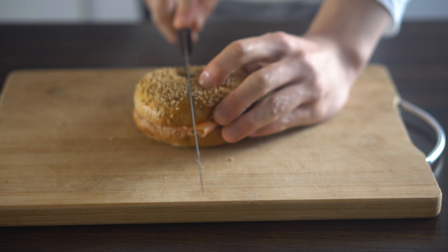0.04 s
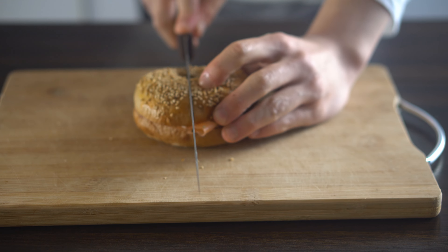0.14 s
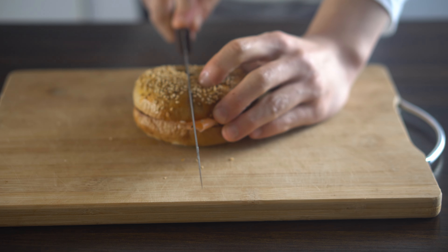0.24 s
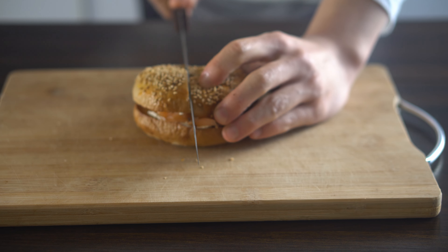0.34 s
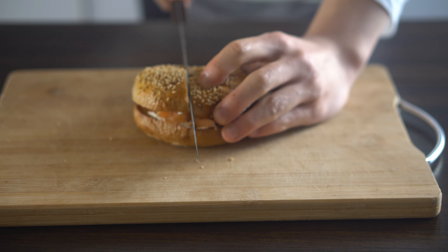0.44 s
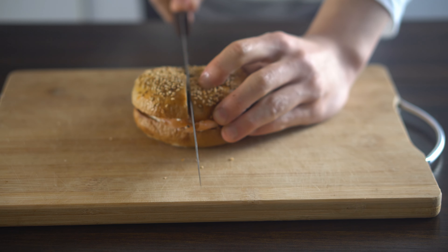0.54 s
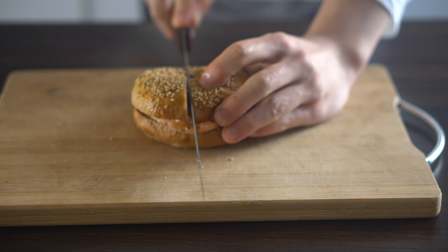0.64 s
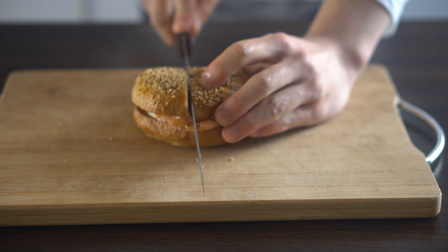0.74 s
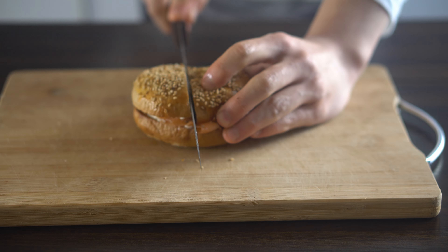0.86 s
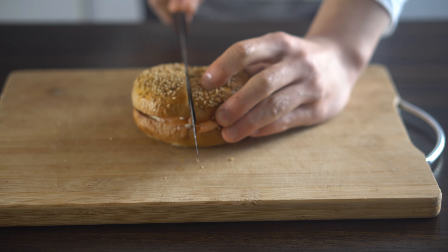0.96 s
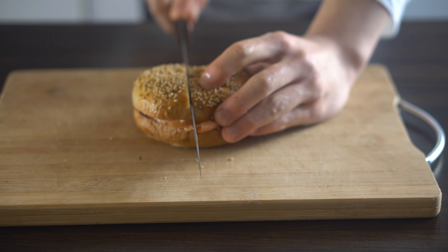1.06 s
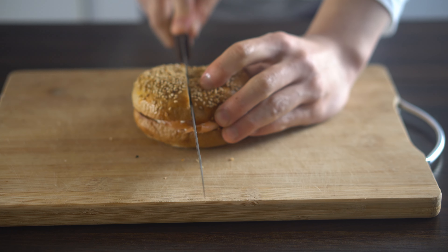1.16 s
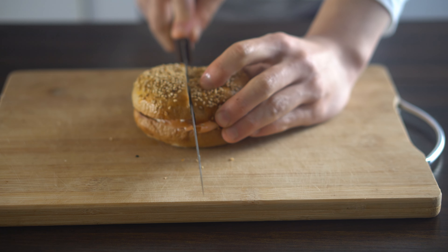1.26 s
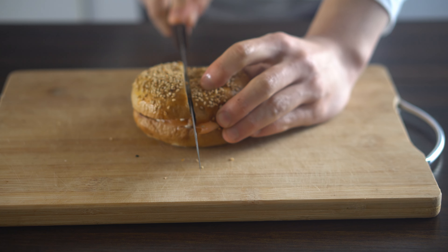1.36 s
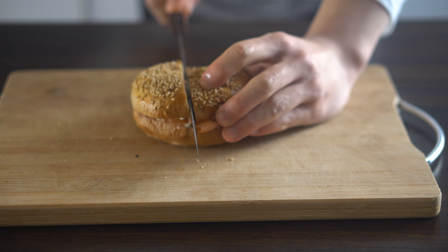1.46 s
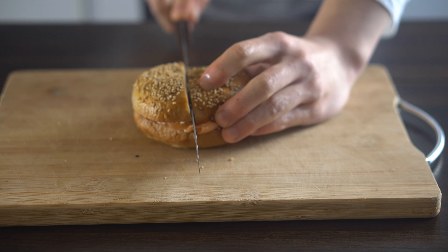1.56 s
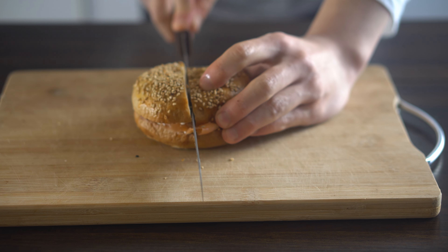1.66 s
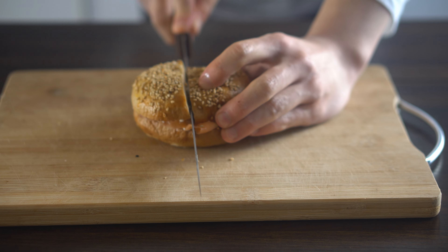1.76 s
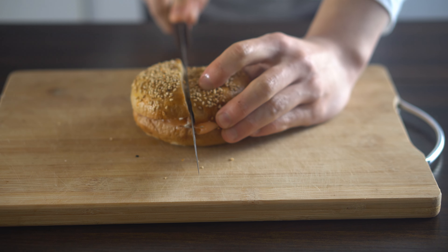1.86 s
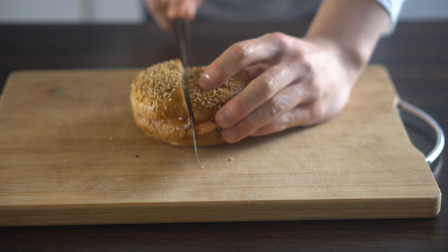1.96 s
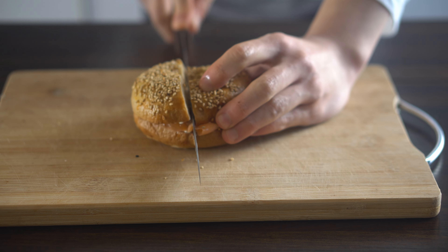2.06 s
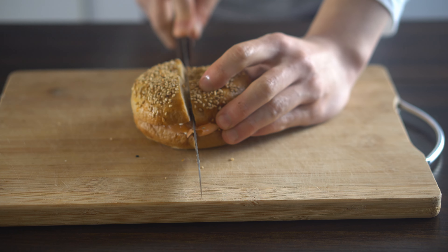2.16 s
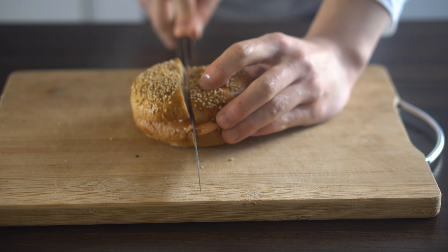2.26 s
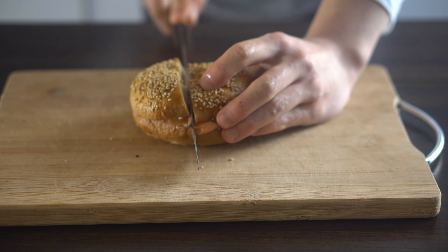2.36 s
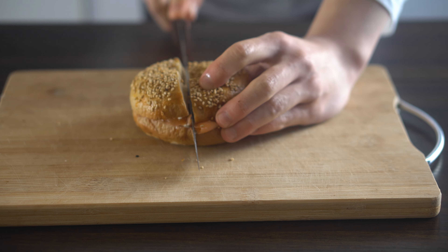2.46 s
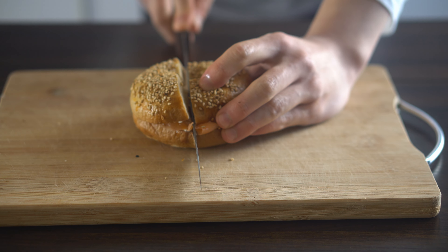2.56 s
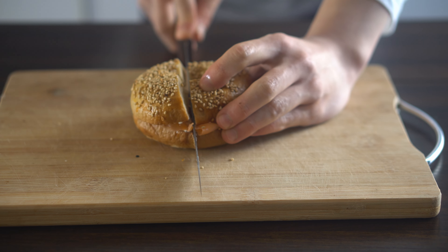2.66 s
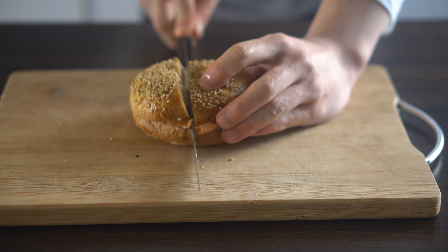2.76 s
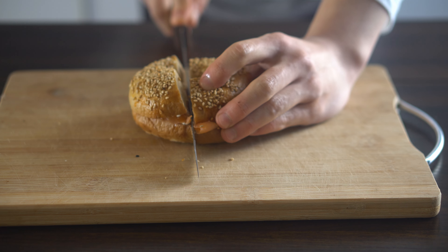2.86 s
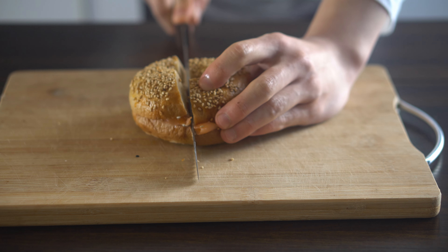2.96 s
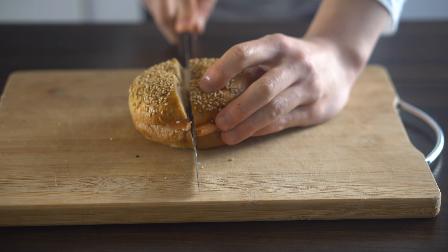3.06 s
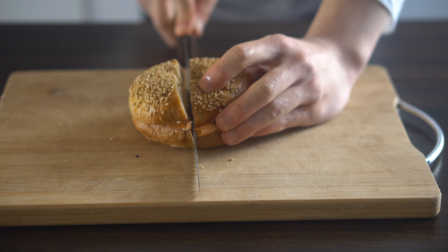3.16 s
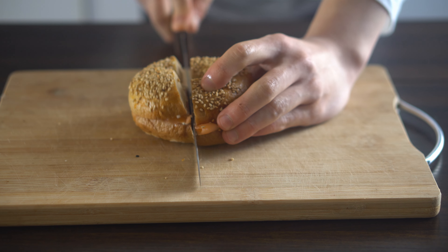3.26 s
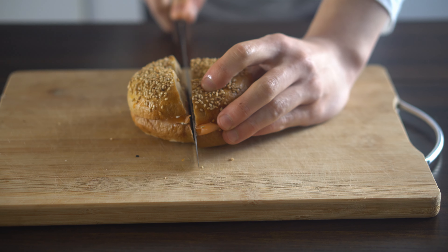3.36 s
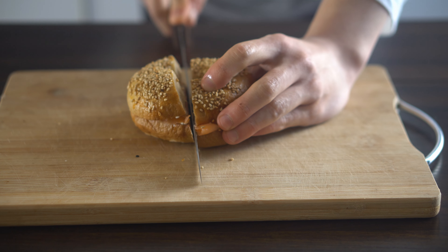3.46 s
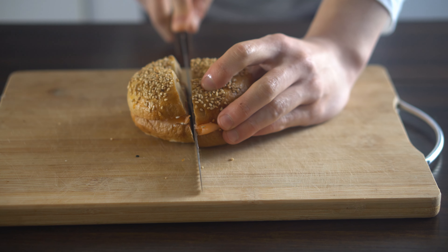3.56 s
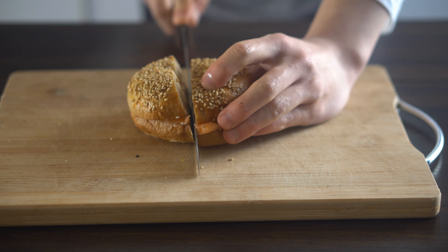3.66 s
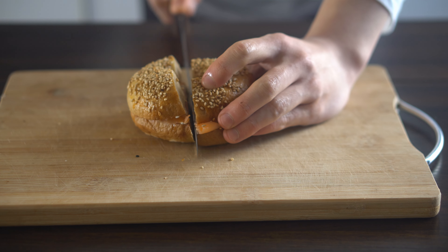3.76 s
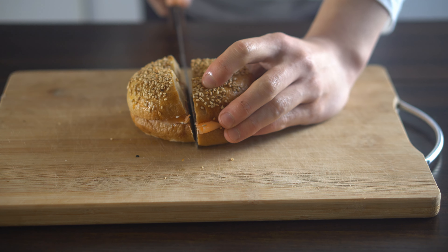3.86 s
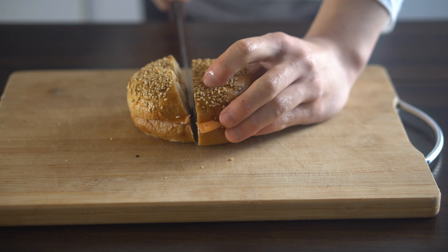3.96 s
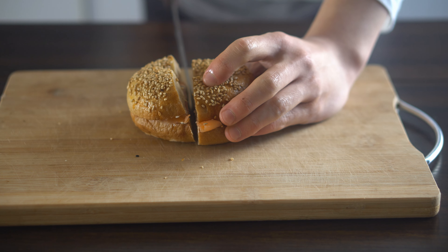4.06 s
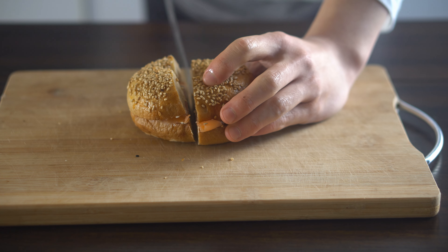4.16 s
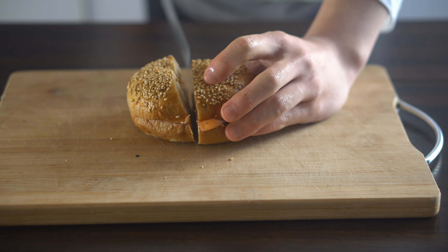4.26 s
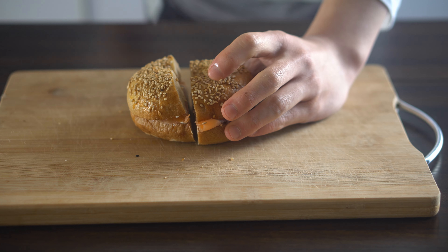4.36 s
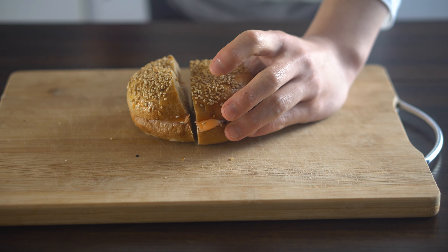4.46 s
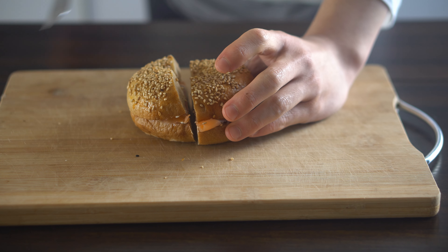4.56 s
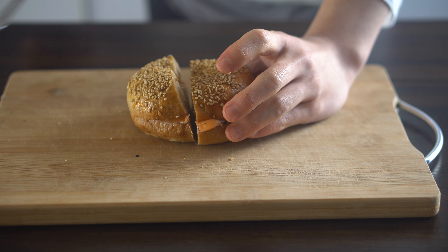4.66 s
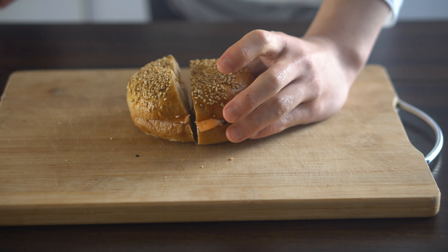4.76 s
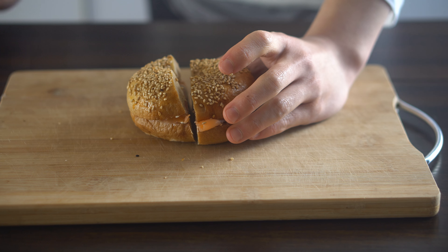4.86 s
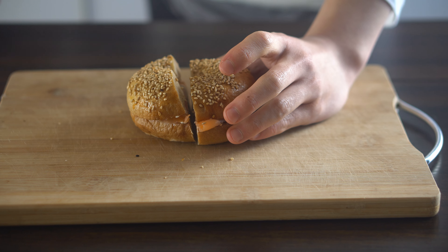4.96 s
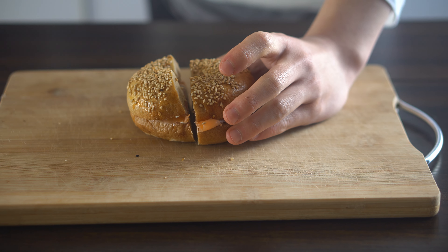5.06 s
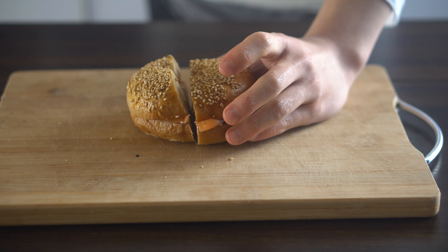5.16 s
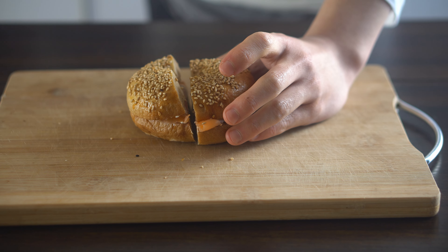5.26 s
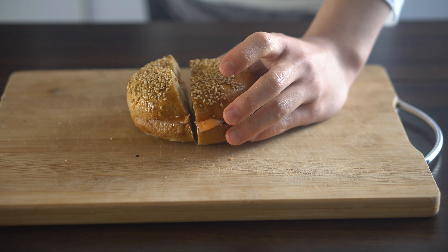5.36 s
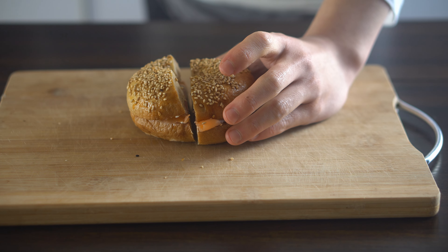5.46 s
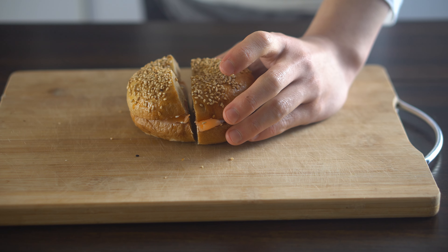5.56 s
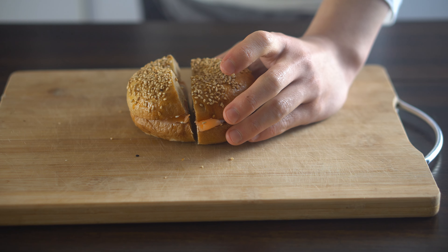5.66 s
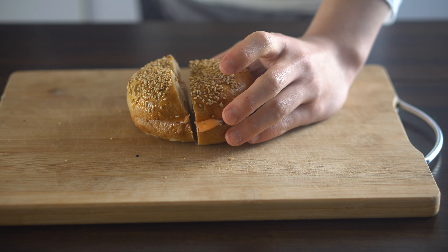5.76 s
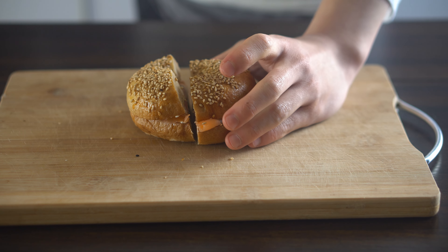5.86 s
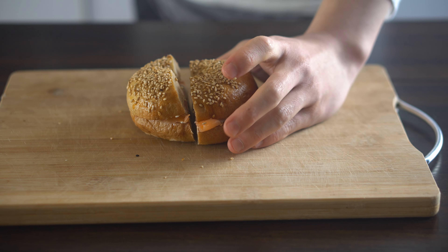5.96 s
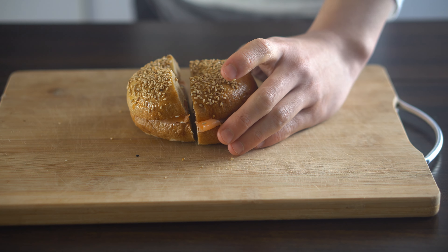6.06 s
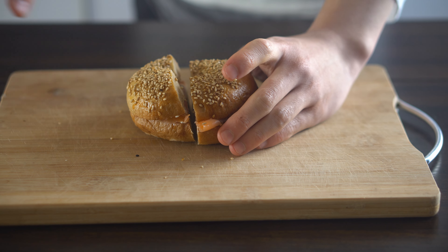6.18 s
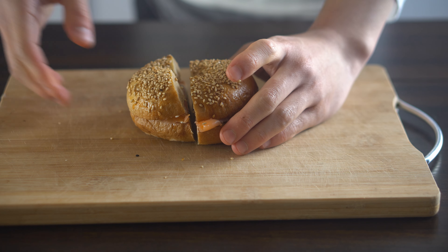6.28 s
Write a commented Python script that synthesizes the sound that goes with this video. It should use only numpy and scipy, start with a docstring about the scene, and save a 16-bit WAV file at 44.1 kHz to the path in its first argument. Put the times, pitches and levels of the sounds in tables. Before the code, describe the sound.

A close stereo sound in a small, reverberant kitchen, over a low wavering hum and faint hiss. From 0 to 0.3 seconds a blade softly rubs and scratches crust. A bright, hard snap at about 0.42 begins the sawing: dry, grainy crunches roughly every quarter second until 2, with crackling flakes, scattered sharp cracks, dull board thuds and slight table rumble. From 2 to 3.3 the strokes become much quieter and softer in the crumb. Around 3.4, 3.55 and 3.8 the teeth scrape wood, louder, hollow and resonant with a rasp. From 3.95 to 4.4 the blade slides free, its tone sinking and becoming muffled. Near quiet follows. At 5.48 to 5.63 the knife chatters onto the table in a few small, gritty, ringing knocks, more distant and echoing. Fingers rustle and nudge the roll faintly at 5.6 to 5.8, then little but room tone.

```python
"""In a small, live kitchen, a bread knife saws through a crusty roll on a wooden board.
Each stroke is a swell of random crust grains, with dull pushes on the board and single cracks of crust.
At the bottom, grains ring the board's resonances as the teeth rasp, and the blade slides out.
The roll rustles under the hand and short gritty blows ring the knife as it is laid on the table.
Filtered noise makes a low hum and faint hiss; random reflections make the room."""
import sys
import numpy as np
from scipy import signal
from scipy.fft import rfft, irfft, next_fast_len
from scipy.io import wavfile
from scipy.ndimage import map_coordinates

SR = 44100
rng = np.random.default_rng(int(sys.argv[2]) if len(sys.argv) > 2 else 0)


def unload_wav(signal):
    """Save mono or channel-first audio to the path in sys.argv[1] as 16-bit WAV at rate SR, clipped to [-1, 1]."""
    wavfile.write(
        sys.argv[1],
        SR,
        np.round(np.clip(np.atleast_2d(signal).T, -1, 1) * 32767).astype(np.int16),
    )


N = 278704  # length in samples

# Levels in the movement and contact tables set the balance; each source then adds its own gain.

# Saw strokes. Each row: fastest moment in seconds, rise in seconds, fall in seconds, crunch in dB,
# splinters in dB, thud on the board in dB, rocking of the table in dB.
SAW_STROKES = [(0.435, 0.042, 0.08, -40, -43, -42.5, -54), (0.655, 0.07, 0.084, -40.5, -47.5, -46.5, -62),
               (0.955, 0.089, 0.054, -40, -45, -47.5, -51), (1.19, 0.12, 0.069, -42, -50.5, -45.5, -49.5),
               (1.445, 0.091, 0.063, -45, -51.5, -42.5, -48), (1.68, 0.081, 0.088, -42, -45.5, -49.5, -53),
               (1.94, 0.077, 0.053, -44.5, -46.5, -52, -49), (2.11, 0.071, 0.13, -51.5, -55.5, -58, -63),
               (2.43, 0.1, 0.064, -50, -55, -58.5, -68), (2.56, 0.036, 0.037, -62, -61, -70, -72),
               (2.68, 0.097, 0.068, -59, -67, -67.5, -74), (2.83, 0.05, 0.13, -57, -60, -63, -72),
               (3.055, 0.05, 0.084, -58.5, -60.5, -64, -62), (3.3, 0.058, 0.039, -68, -60.5, -72, -72)]
STROKE_ROUNDNESS = 1.53  # 1 = pointed swell, 2 = bell
THUD_LAG_S, THUD_WIDTH = 0.016, 1.1  # the push reaches the board through the soft crumb
SWAY_WIDTH = 1.46  # the table rocks this many times longer than the stroke
CRUMB_FROM_S, CRUMB_BY_S = 2, 2.47  # the blade passes from brittle crust into soft crumb
DULL_FROM_S, DULL_SHARE = 0.95, 0.27  # the crunch loses this share of its treble as the blade sinks in

# Single cracks of the crust. Each row: start in seconds, sharp edge in dB, body in dB above the edge.
CRUST_SNAPS = [(0.246, -49, 13), (0.2753, -35, 2), (0.3849, -31.5, 6), (0.398, -34, 4), (0.406, -28, 5.5),
               (0.4219, -13.5, -5), (0.608, -34, 9), (0.851, -40, 7.5), (0.938, -32, 9), (1.084, -40.5, 10),
               (1.606, -23.5, -5.5), (1.696, -21.5, -15), (1.9072, -19.5, -12), (2.084, -28, -11),
               (2.207, -45, 10.5), (2.431, -42, -1)]

# The blade settling on the crust before it bites. Each row: fastest moment in seconds, rise in seconds,
# fall in seconds, dull rub in dB, scratch in dB.
SETTLING_MOVES = [(0.09, 0.11, 0.074, -51, -50), (0.275, 0.034, 0.085, -49, -57.5)]

# Strokes with the teeth on the board. Each row: fastest moment in seconds, rise in seconds,
# fall in seconds, wood in dB, rasp in dB, the board's lowest resonance in dB.
BOARD_SCRAPES = [(3.19, 0.085, 0.066, -53, -62.5, -52.5), (3.385, 0.053, 0.057, -28, -39, -31.5),
                 (3.54, 0.076, 0.062, -30, -47.5, -38), (3.785, 0.089, 0.069, -27, -41, -43)]
SCRAPE_ROUNDNESS = 1.78
DRAG_LAG_S, DRAG_WIDTH = 0.033, 1.1  # the board's lowest resonance swells later and longer than the scrape

# The blade sliding out of the cut. Each row: time in seconds, rub in dB, the board's lowest resonance in dB.
BLADE_SLIDE = [(3.9, -56, -53), (3.99, -47, -63), (4.11, -40.5, -50), (4.25, -42, -42), (4.44, -73, -73)]
MUFFLE_FROM_S, MUFFLE_BY_S = 4.157, 4.236  # the roll closes on the blade as it leaves
GLIDE_FROM_S, GLIDE_BY_S = 4.03, 4.24  # the blade's resonances sink on the way out
GLIDE_SHARE = 0.16  # by this share of their listed pitch

# The hand shifting on the roll. Each row: fastest moment in seconds, rise in seconds, fall in seconds,
# rustle in dB, thud in dB.
HAND_MOVES = [(5.603, 0.0054, 0.024, -55, -50.5), (5.753, 0.0083, 0.033, -53, -71),
              (5.77, 0.18, 0.14, -66, -56.5), (6.11, 0.069, 0.049, -74, -63.5)]

# The knife meeting the table. Each row: start in seconds, level in dB.
TABLE_CONTACTS = [(5.4776, -31.5), (5.481, -31.5), (5.489, -35), (5.501, -38), (5.517, -38), (5.598, -36.5),
                  (5.625, -43)]

# Resonances of the board, its lowest one, the blade, the knife on the table, and the hum.
# Each row: pitch in Hz, width in Hz, level in dB.
BOARD_MODES = [(324, 39, 2.5), (437, 66, 0), (560.6, 8.8, 10), (635, 3, 5.5), (731, 23, 1.5), (872, 50, -2),
               (893, 18, 3.5), (1150, 38, -3.5), (1301, 24.6, 6), (1453, 58, -6), (2090, 160, -27),
               (2560, 47, -15)]
BOARD_LOWEST_MODE = [(248.6, 82, 0)]
BLADE_MODES = [(338, 83, -2), (436, 62, 1), (547, 48, -5), (1083, 162, 0), (1365, 152, 0), (2290, 460, -13),
               (2940, 280, -13), (4200, 580, -23.5)]
KNIFE_MODES = [(247, 35, -8.5), (720, 93, -6.5), (832, 50, -4.5), (1026, 22, -0.5), (1455, 35, -6),
               (1604, 59, -3), (2185, 71, -7.5), (2400, 114, -7), (2950, 28, -17)]
HUM_MODES = [(42.9, 2.4, 5), (55, 12, -6), (70.7, 2.4, -8)]

# Tone colours of each kind of noise. Each row: frequency in Hz, relative level in dB per Hz.
CRUNCH_COLOUR = [(200, -14.5), (380, -0.5), (700, -1), (1200, 1.5), (1900, 2.1), (2800, -0.8), (4000, -3.8),
                 (5400, -8.5), (9000, -14), (12000, -14.5), (16000, -65)]
SPLINTER_COLOUR = [(3000, -30), (6000, -13), (10000, -7), (12500, -2), (14500, 1), (16000, 1)]
CRUMB_COLOUR = [(700, -2.5), (2500, 2), (5500, 0.5), (9000, -3), (15000, -4)]
THUD_COLOUR = [(70, -14.5), (105, -12), (135, 3), (165, -9), (215, -0.5), (330, -4), (450, -12), (800, -26),
               (2000, -86)]
CRACK_COLOUR = [(200, -26), (700, -0.5), (1800, 4), (3200, -4), (6000, -11.5), (12000, -13)]
RUB_COLOUR = [(200, -25.5), (450, 1.5), (800, 2.5), (1200, -5), (2000, -20), (5000, -28), (16000, -44)]
RUSTLE_COLOUR = [(500, -21), (2000, -6.5), (4200, 4.5), (7000, -4), (10000, -4), (15000, -2)]
RASP_COLOUR = [(800, -23), (1500, 4), (2200, 6), (3000, 0.5), (4000, -4.5), (5500, -10), (7500, -19),
               (11000, -21.5), (14000, -15), (16000, -22)]
CLATTER_COLOUR = [(200, -4), (700, -11), (1800, 0), (3200, 1), (4500, -3.5), (7000, -9.5), (9000, -18.5),
                  (14000, -26)]
AIR_COLOUR = [(47, -13.5), (80, -4.5), (98, -14), (174, -19), (404, -25.5), (515, -26.5), (643, -23),
              (702, -26.5), (917, -26), (1220, -31), (2430, -33.5), (3390, -35.5), (16000, -45.5)]

# Stereo width. Each row: frequency in Hz, likeness of left and right (1 = the same).
LEFT_RIGHT_LIKENESS = [(100, .98), (300, .94), (550, .78), (1000, .68), (2200, .6), (4200, -.1),
                       (8000, .28), (13000, .54)]
# Stereo position. Each row: frequency in Hz, left minus right in dB.
LEFT_LEAN = [(200, 0.37), (1000, 0.64), (2200, 1.2), (4200, 2.6), (8000, 2.8), (14000, 0.89)]
# How long the kitchen rings. Each row: frequency in Hz, time to fade by 60 dB in seconds.
KITCHEN_FADE = [(150, 0.47), (600, 0.61), (2500, 0.65), (7000, 0.67), (15000, 0.066)]
TOP_HZ = 15950


def sawing():
    """The teeth break the crust in clumps; the crumb passes dull pushes to the board."""
    crunch, splinter = swells(SAW_STROKES, STROKE_ROUNDNESS)[:2]
    push = swells(SAW_STROKES, STROKE_ROUNDNESS, lag=THUD_LAG_S, width=THUD_WIDTH)[2]
    bite = unit(amp(1.2 * wobble(130)))  # teeth catch and let go
    body = amp(2.0) * crunch * unit(coloured(bite * grains(1800, spread_db=4.5), CRUNCH_COLOUR))
    lost_treble = DULL_SHARE * ramp(DULL_FROM_S, CRUMB_BY_S) * treble(body, 1800)

    flakes = bite * grains(1200, spread_db=7.0)
    depth = ramp(CRUMB_FROM_S, CRUMB_BY_S)  # 0 in the crust, 1 in the crumb
    crust_fizz = (1 - depth) * unit(coloured(flakes, SPLINTER_COLOUR))
    crumb_fizz = amp(-0.5) * depth * unit(coloured(flakes, CRUMB_COLOUR))
    fizz = amp(4.0) * splinter * (crust_fizz + crumb_fizz)

    thud = amp(1.0) * push * unit(coloured(bite * grains(600, spread_db=4), THUD_COLOUR))
    return body - lost_treble + fizz + thud


def crackle():
    """Small flakes pop in a steady, uneven patter while the blade saws or scratches."""
    sawn = swells(SAW_STROKES, STROKE_ROUNDNESS)[1] * (1 - .5 * ramp(CRUMB_FROM_S, CRUMB_BY_S))
    scratched = swells(SETTLING_MOVES, STROKE_ROUNDNESS)[1]
    pops = grains(70, spread_db=3) * (sawn + scratched) * amp(-8)
    return coloured(pops, SPLINTER_COLOUR) + coloured(pops, CRACK_COLOUR)


def snaps():
    """Larger flakes of crust crack off one at a time, each with a sharp edge and a fuller body."""
    s, edge_db, body_db = np.transpose(CRUST_SNAPS)
    edge = bursts(s, edge_db + 8, life=0.0007, grit=0.3)
    body = bursts(s, edge_db + body_db + 12.5, life=0.0023, grit=0.39)
    return coloured(edge, SPLINTER_COLOUR) + coloured(body, CRACK_COLOUR)


def settling():
    """The blade first rubs, nudges and scratches the crust without breaking it."""
    rub, scratch = swells(SETTLING_MOVES, STROKE_ROUNDNESS)
    rubbing = unit(coloured(grains(1500, spread_db=2.5), RUB_COLOUR))
    nudging = amp(-0.5) * unit(coloured(grains(600, spread_db=3), THUD_COLOUR))
    scratching = amp(2.5) * unit(coloured(grains(1200, spread_db=10), RUSTLE_COLOUR))
    return rub * (rubbing + nudging) + scratch * scratching


def scraping():
    """The serrations judder over the wood and ring the board; then the blade slides free."""
    wood, rasp = swells(BOARD_SCRAPES, SCRAPE_ROUNDNESS)[:2]
    drag = swells(BOARD_SCRAPES, SCRAPE_ROUNDNESS, lag=DRAG_LAG_S, width=DRAG_WIDTH)[2]
    s, *levels_db = np.transpose(BLADE_SLIDE)
    time = np.arange(N) / SR
    # Outside the listed times the slide is silent.
    slide, slide_drag = [amp(np.interp(time, s, db, left=-np.inf, right=-np.inf)) for db in levels_db]

    slips = grains(1400, spread_db=2.0) * amp(1.4 * wobble(120))
    ringing = unit(rung(slips, BOARD_MODES))
    rubbing = amp(-1) * unit(coloured(grains(1400, spread_db=4.0), RUB_COLOUR))
    board = amp(-2.5) * wood * unit(ringing + rubbing)
    teeth = amp(1) * (rasp + amp(-14.5) * slide) * unit(coloured(slips, RASP_COLOUR))
    low_ring = unit(rung(rung(slips, BOARD_LOWEST_MODE), BOARD_LOWEST_MODE))
    boom = amp(-2) * (drag + slide_drag) * low_ring
    blade_ring = unit(rung(grains(2500, spread_db=4.5), BLADE_MODES))
    blade = amp(-0.5) * slide * sinking(blade_ring)
    return board + muffled(blade) + teeth + boom


def sinking(x):
    """The blade's resonances glide down as it leaves the roll, like a tape slowing down."""
    speed = 1 + GLIDE_SHARE * (.5 - ramp(GLIDE_FROM_S, GLIDE_BY_S))
    return map_coordinates(x, [np.cumsum(speed)])


def muffled(x):
    """The soft roll damps the upper resonances where it presses on the blade."""
    return x - ramp(MUFFLE_FROM_S, MUFFLE_BY_S) * treble(x, 850)


def hand():
    """Fingers shift on the crust and nudge the roll."""
    rustle, nudge = swells(HAND_MOVES, roundness=1.04)
    crumbs = unit(coloured(grains(2500, spread_db=4), CRUMB_COLOUR))
    thud = unit(coloured(grains(500, spread_db=3), THUD_COLOUR))
    return amp(5.0) * rustle * crumbs + amp(4.0) * nudge * thud


def knife_down():
    """Handle and blade chatter on the table: each blow rings the knife and adds a clatter."""
    s, db = np.transpose(TABLE_CONTACTS)
    blows = bursts(s, db + 21.0, life=0.0013, grit=0.25)
    return rung(blows, KNIFE_MODES) + amp(-5.0) * coloured(blows, CLATTER_COLOUR)


def table():
    """The strokes and the first touch of the blade rock the table at its lowest resonance."""
    stroke_sway = swells(SAW_STROKES, STROKE_ROUNDNESS, lag=THUD_LAG_S, width=SWAY_WIDTH)[3]
    first_touch = amp(3) * swells(SETTLING_MOVES[:1], STROKE_ROUNDNESS)[0]
    top = [(49.8, 20, 0)]  # Hz, width in Hz, dB
    rumble = unit(rung(rung(rng.standard_normal(N), top), top))
    return amp(-0.5) * (stroke_sway + first_touch) * rumble


def room_tone():
    """A wavering low machine hum, made of noise through narrow resonances, under faint hiss."""
    hum = rung(rung(rng.standard_normal(N), HUM_MODES), [(55.0, 43, 0)])
    hum = unit(filtered(unit(hum), lambda hz: 1 / (1 + (36 / (hz + 1)) ** 12)))  # less below 36 Hz
    air = unit(widened(coloured(rng.standard_normal((2, N)), AIR_COLOUR)))
    return amp(-59) * hum + amp(-57.5) * air


def kitchen(x, near_db, far_db):
    """Direct sound, quick reflections and the room's tail; the echo pattern blends anew every 0.2 s."""
    hop, length = SR // 5, SR // 2
    # Eight stereo tails of noise, fading at a different speed at each frequency.
    hz, t, z = signal.stft(rng.standard_normal((8, 2, length)), SR, nperseg=256)
    fading = amp(-60 * t / along(KITCHEN_FADE, hz)[:, None])
    tails = signal.istft(z * fading, SR, nperseg=256)[1][..., :length]
    tails *= amp(far_db) / np.linalg.norm(tails, axis=-1, keepdims=True)
    fade = np.exp(-np.arange(length // 8) / SR / 0.0095)
    fade[:SR // 1000] = 0  # the quick reflections start after one millisecond
    fade_size = np.linalg.norm(fade)

    padded = np.pad(x, (hop, 2 * hop))
    window = np.sin(np.linspace(0, np.pi, 2 * hop))
    echo = np.zeros((2, len(padded) + length))
    for k, start in enumerate(range(0, N + hop, hop)):
        walls = tails[k % len(tails)].copy()
        walls[:, :len(fade)] += amp(near_db) * rng.standard_normal((2, len(fade))) * fade / fade_size
        piece = window * padded[start:start + 2 * hop]
        answer = signal.fftconvolve(piece[None], walls, axes=1)
        echo[:, start:start + answer.shape[1]] += answer
    total = np.sqrt(1 + amp(near_db) ** 2 + amp(far_db) ** 2)
    return (x + widened(echo[:, hop:hop + N])) / total


def widened(pair):
    """Two unrelated signals become left and right, most alike in the bass."""
    def shares(hz):
        turn = np.arccos(np.clip(along(LEFT_RIGHT_LIKENESS, hz), -1, 1)) / 2
        return np.array([np.cos(turn), np.sin(turn)])
    mid, side = filtered(pair, shares)
    return np.array([mid + side, mid - side])


def swells(rows, roundness, lag=0, width=1):
    """Each movement speeds up and slows down again; one gain per sample for each dB column."""
    rows = np.array(rows)
    peak, rise, fall = rows.T[:3, :, None]
    clock = np.arange(0, N, 32) / SR  # every 32nd sample is enough for a slow curve
    t = clock - lag - peak
    speed = np.exp(-np.abs(t / (width * np.where(t < 0, rise, fall))) ** roundness)
    gains = np.sqrt(amp(rows[:, 3:].T) ** 2 @ speed ** 2)  # overlapping movements add as power
    return [np.interp(np.arange(N) / SR, clock, gain) for gain in gains]


def grains(rate, spread_db):
    """Tiny fractures at random moments, rate a second on average, of randomly varied size."""
    happens = rng.random(N) < rate / SR
    size = amp(spread_db * np.clip(rng.standard_normal(N), -3, 1.7))
    return unit(happens * size * rng.choice([-1, 1], N))


def bursts(times, levels_db, life, grit):
    """Each contact is a sharp push followed by a brief gritty decay, life in seconds."""
    out, t = np.zeros(N + SR), np.arange(SR // 20) / SR
    for s, db in zip(times, levels_db):
        burst = grit * rng.standard_normal(len(t)) * np.exp(-t / life)
        burst[0] = 1
        out[round(s * SR):][:len(t)] += amp(db) * burst / np.linalg.norm(burst)
    return out[:N]


def rung(x, modes):
    """x through a body's resonances, unit power gain; neighbours ring with opposite sign."""
    def response(f):
        h = 0
        for k, (centre, width, db) in enumerate(modes):
            damping = 1j * f * width
            h = h + (-1) ** k * amp(db) * damping / (centre * centre - f * f + damping)
        return h / np.sqrt(np.mean(np.abs(h) ** 2))
    return filtered(x, response)


def coloured(x, spectrum):
    """A filter that never sounds ahead of its input, with the given spectrum and unit power gain."""
    def response(hz):
        # Folding the cepstrum (the spectrum of the log spectrum) gives minimum phase.
        cepstrum = irfft(np.log(unit(amp(along(spectrum, hz))) + 1e-6))
        half = len(cepstrum) // 2
        cepstrum[1:half] *= 2
        cepstrum[half + 1:] = 0
        return np.exp(rfft(cepstrum))
    return filtered(x, response)


def treble(x, corner_hz):
    """The part of x above a soft corner."""
    return filtered(x, lambda hz: hz ** 4 / (hz ** 4 + float(corner_hz) ** 4))


def filtered(x, response):
    """x times a complex response of frequency."""
    m = 2 * next_fast_len(N // 2 + SR // 4)
    return irfft(rfft(x, m) * response(np.fft.rfftfreq(m, 1 / SR)), m)[..., :N]


def wobble(rate):
    """A smooth random curve, rate knots a second."""
    knots = rng.standard_normal(int(N * rate / SR) + 4)
    return map_coordinates(knots, [np.arange(N) * rate / SR])


def ramp(start, end):
    """0 before start, 1 after end, both in seconds."""
    return np.interp(np.arange(N) / SR, [start, end], [0, 1])


def along(points, hz):
    """Reads a curve of (Hz, value) points on a log frequency axis."""
    f, v = np.transpose(points)
    return np.interp(np.log(hz + 1), np.log(f + 1), v)


def amp(db):
    """Decibels to gain."""
    return 10 ** (np.asarray(db) / 20)


def unit(x):
    """Scaled to an average (rms) level of 1."""
    return x / np.sqrt(np.mean(x ** 2) + 1e-20)


def scene():
    """Cutting sounds near, flakes drier, the knife laid down farther off; all lean a little left."""
    cutting = kitchen(settling() + sawing() + scraping() + hand(), near_db=0, far_db=-1)
    flakes = kitchen(snaps() + crackle(), near_db=-7, far_db=-5)
    aside = kitchen(knife_down(), near_db=1.5, far_db=8.5)
    # Half of the lean raises the left, half lowers the right.
    leaning = filtered(cutting + flakes + aside, lambda hz: amp(np.outer([.5, -.5], along(LEFT_LEAN, hz))))
    return leaning + table() + room_tone()


def record(dry):
    """Nothing above the band limit is kept."""
    return filtered(dry, lambda hz: hz < TOP_HZ)


dry = scene()
out = record(dry)
unload_wav(out)
```